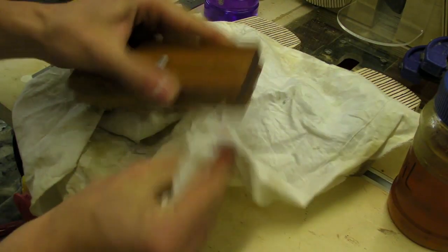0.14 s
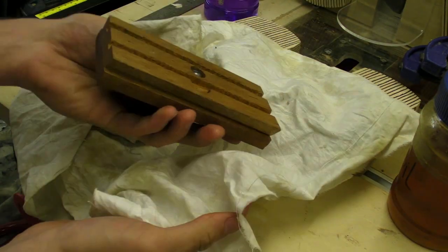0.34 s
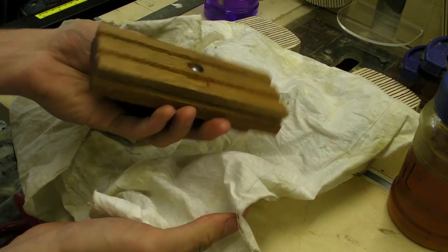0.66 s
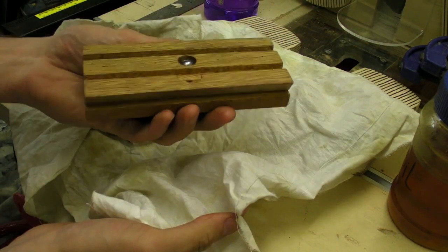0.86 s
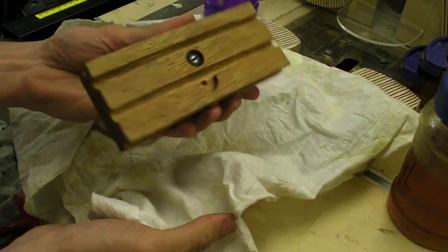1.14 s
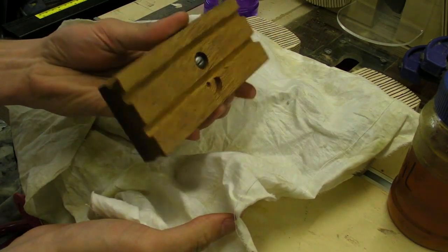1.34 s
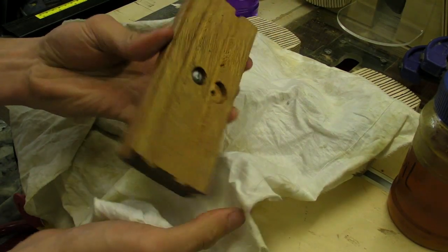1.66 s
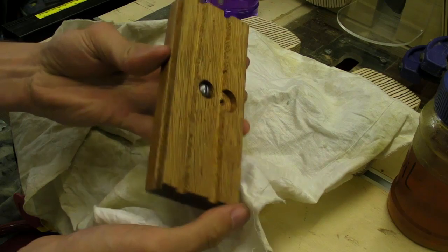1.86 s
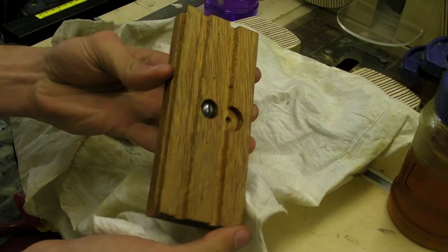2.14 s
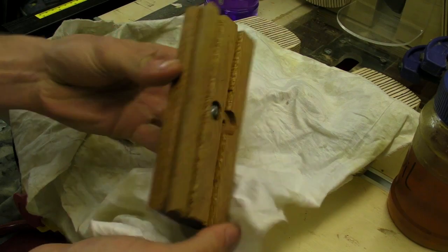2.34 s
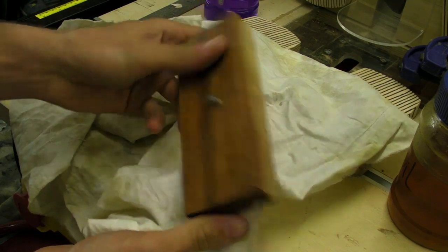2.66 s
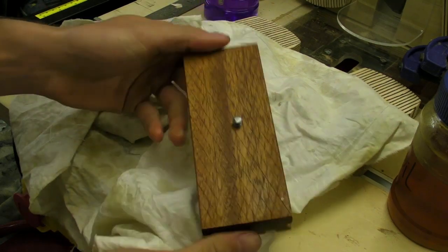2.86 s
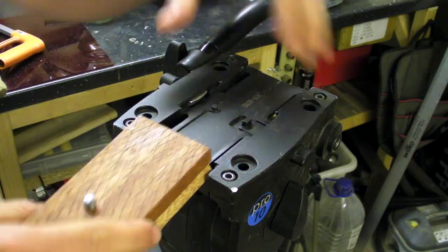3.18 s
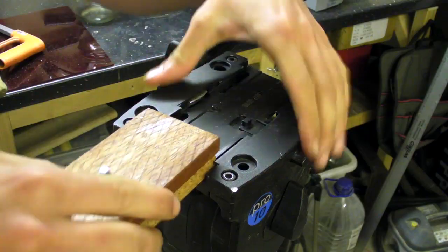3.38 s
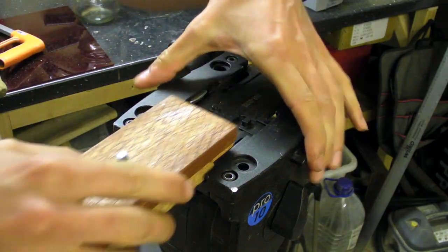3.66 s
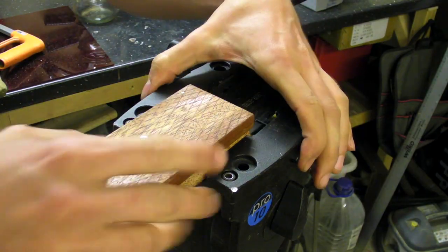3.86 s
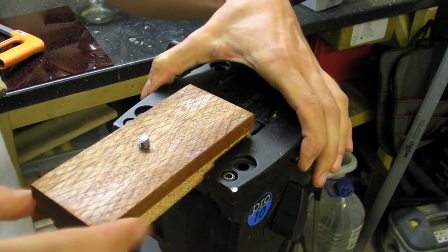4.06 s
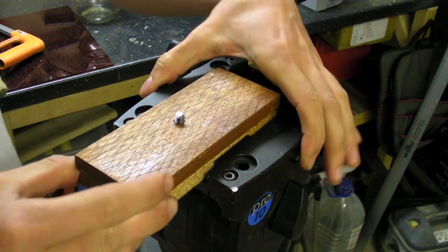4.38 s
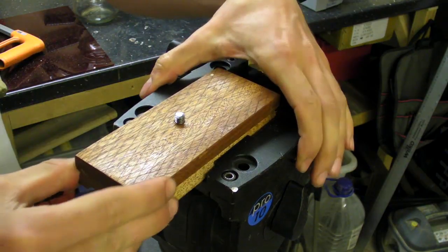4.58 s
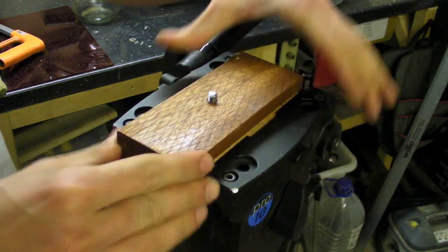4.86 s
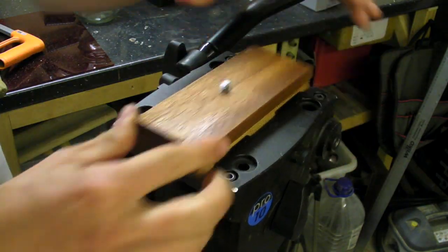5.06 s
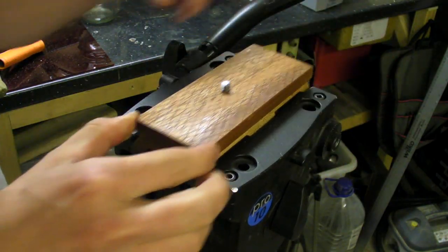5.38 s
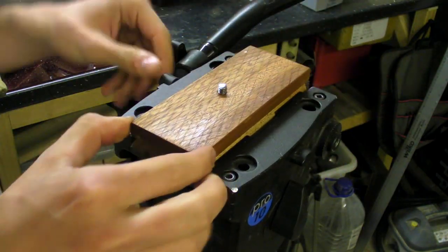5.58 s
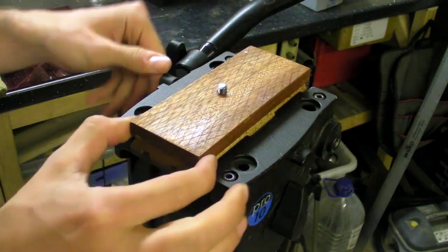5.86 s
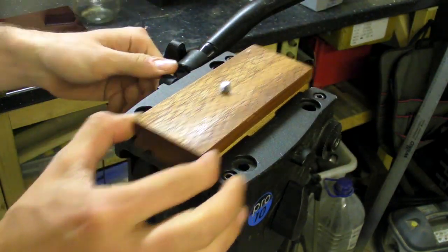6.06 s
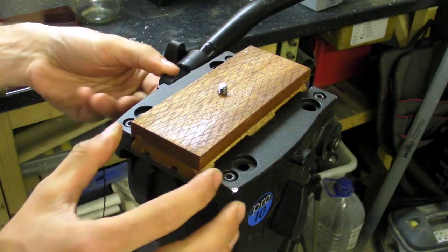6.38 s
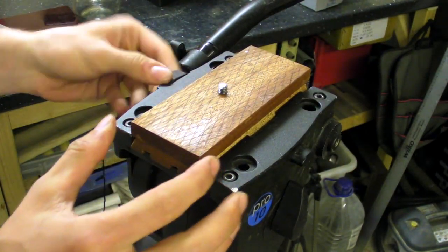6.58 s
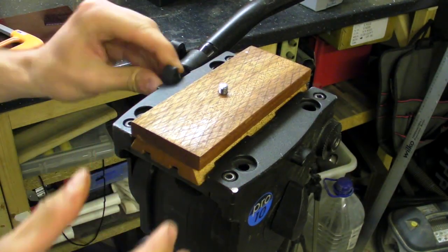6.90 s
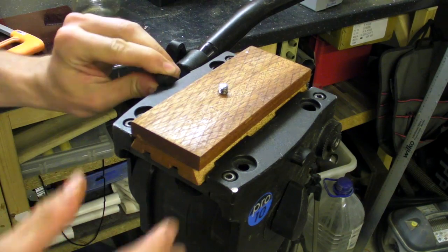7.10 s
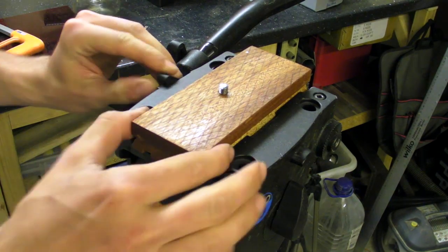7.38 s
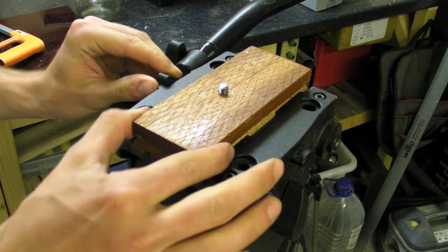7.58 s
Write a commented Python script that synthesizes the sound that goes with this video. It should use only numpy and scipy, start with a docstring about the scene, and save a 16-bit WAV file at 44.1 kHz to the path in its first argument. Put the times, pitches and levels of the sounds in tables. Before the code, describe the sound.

A cloth wipes a small wooden plate, faint handling follows, then wood knocks and slides on a metal tripod head and a catch snaps loudly.

```python
"""In a quiet workshop, over mains hum and microphone hiss, a cloth wipes a small wooden plate: shaped noise.
Hands then turn the plate over with soft rubs and dry fingertip ticks; short faint narrow hisses are heard.
It slides into the groove of a metal tripod head: noise strokes, ringing knocks, one thin squeak.
The legs sway with a low ring at the shoves; just after five seconds a catch snaps, and a lever is worked.
Rubs and snap reach the microphone dry; knocks and ticks also bring back reflections from the room."""
import sys
import numpy as np
from scipy import signal
from scipy.fft import rfft, irfft
from scipy.io import wavfile
from scipy.ndimage import uniform_filter1d

SR = 44100
rng = np.random.default_rng(int(sys.argv[2]) if len(sys.argv) > 2 else 0)


def to_wav(s):
    """Save 16-bit WAV."""
    ch = np.atleast_2d(s).T  # columns
    pcm = np.round(np.clip(ch, -1, 1) * 32767)  # PCM
    wavfile.write(sys.argv[1], SR, pcm.astype(np.int16))


N = 341334  # length [samples]


def gain_of(db):
    """Decibels to amplitude."""
    return 10 ** (np.asarray(db) / 20)


def evened(x):
    """Scales a signal to rms 1."""
    return x / np.sqrt(np.mean(x ** 2) + 1e-20)


def unsteady(shape, span):
    """Slow random wandering of rms 1: noise averaged over a span of samples."""
    return evened(uniform_filter1d(rng.standard_normal(shape), span))


def read(points, hz):
    """Reads a spectrum on a log-frequency axis."""
    f, value = np.transpose(points)
    return np.interp(np.log(hz + 1), np.log(f + 1), value)


def coloured(x, points):
    """Shapes a signal by a spectrum in dB."""
    level_db = read(points, np.fft.rfftfreq(len(x), 1 / SR))
    return irfft(rfft(x) * gain_of(level_db), len(x))


def resonate(x, hz, width):
    """Shifts hz down to zero, smooths, and shifts back: a resonance of gain 1."""
    turn = np.exp(2j * np.pi * np.cumsum(hz * np.ones(len(x))) / SR)
    pole = np.exp(-np.pi * width / SR)
    return 2 * (turn * signal.lfilter([1 - pole], [1, -pole], x / turn)).real


def patchy(x, depth_db):
    """Gives a signal random patches of louder and softer colour."""
    z = signal.stft(x, nperseg=256)[2]
    noise = rng.standard_normal(z.shape)
    patches = evened(uniform_filter1d(uniform_filter1d(noise, 6, 0), 10, 1))  # over frequency, then time
    return signal.istft(z * gain_of(depth_db * patches), nperseg=256)[1][:N]


EDGE_DB = 20  # how far a stroke swells over its rise and sinks over its fall


def stroke(s, rise, hold, fall, db):
    """Gain of one gesture: swells to full, holds, sinks away, evenly in decibels."""
    rise, hold, fall, out = abs(rise), abs(hold), abs(fall), np.zeros(N)
    near = np.arange(max(int((s - 4 * rise) * SR), 0), min(int((s + hold + 4 * fall) * SR), N))
    t = near / SR - s
    edges = np.maximum(np.maximum(-t / rise, (t - hold) / fall), 0)
    out[near] = gain_of(db - EDGE_DB * edges)
    return out


def strokes(rows, axis):
    """Sums all gestures of a table, at the level in one of its columns."""
    return sum(stroke(*row[:4], row[axis]) for row in rows)


# Room rumble and microphone hiss together: (frequency [Hz], relative level [dB])
AIR_SPECTRUM = [(15, -61.5), (25, -31), (53, 2.5), (130, -4.5), (200, -6), (263, -12), (293, -17.5),
                (394, -7.5), (560, -18.5), (1700, -26), (2220, -23.5), (16000, -33)]
AIR_DB = -67.5  # rms level
# Mains hum partials: (frequency [Hz], level [dB])
HUM_PARTIALS = [(200.3, -74), (300.6, -83), (400.7, -81)]
# One spell of dull rustle: (time at full [s], rise [s], hold [s], fall [s], level [dB])
DULL_RUSTLE = (6.5, 2, 0.07, 1.1, -68.5)


def air():
    """Room rumble, microphone hiss, a spell of dull rustle and wavering mains hum."""
    t = np.arange(N) / SR
    hiss = gain_of(AIR_DB) * evened(patchy(coloured(rng.standard_normal(N), AIR_SPECTRUM), 2.1))
    rustle = evened(resonate(resonate(rng.standard_normal(N), 490.0, 341), 460, 340))
    out = hiss + rustle * stroke(*DULL_RUSTLE)
    waver = unsteady((len(HUM_PARTIALS), N), 4000)
    for (hz, db), w in zip(HUM_PARTIALS, waver):
        out += np.sqrt(2) * gain_of(db + 1.4 * w) * np.sin(2 * np.pi * hz * t)
    return out


# Strokes of the cloth:
# (time at full [s], rise [s], hold [s], fall [s], rub body level [dB], swish level [dB])
CLOTH_WIPES = [(0, .01, .13, 0.028, -53.5, -44), (.215, 0.047, 0.1985, 0.0033, -64.5, -58.5)]
# Colour of the cloth's swish: (frequency [Hz], relative level [dB])
SWISH_SPECTRUM = [(1300, -11), (2200, -7), (2800, -4.5), (4500, -8.5), (6700, -4), (11000, -8),
                  (16000, -12)]
# Hollow under the wiping hand: (time [s], frequency [Hz], lift [gain])
HAND_HOLLOW = [(0, 3430, 4.8), (.2, 3350, 0.55), (.3, 3300, 1), (.33, 3450, 2.3), (.41, 3750, 2.4)]
# Noise strokes, dull and bright: rubs, and short swells peaking around the hits:
# (time at full [s], rise [s], hold [s], fall [s],
# body level [dB], fine hiss level [dB], low grind level [dB])
NOISE_STROKES = [(0.705, .05, .01, 0.069, -81.5, -70.5, -87), (0.831, 0.054, .006, 0.029, -79, -69.5, -85),
                 (1.1, 0.11, 0.0091, 0.071, -87, -73.5, -88), (1.608, 0.073, 0.026, 0.085, -77, -76.5, -76),
                 (2.339, 0.089, 0.26, 0.11, -63, -71, -74), (2.68, 0.11, 0.058, 0.077, -65, -60.5, -68.5),
                 (3.237, 0.079, 0.016, 0.15, -52.5, -61, -47),
                 (3.445, 0.014, 0.002, 0.018, -32.5, -43.5, -39),
                 (3.531, 0.079, 0.056, 0.05, -58, -68, -54), (3.708, 0.11, 0.069, 0.13, -52.5, -60, -51),
                 (4.171, 0.068, 0.084, 0.086, -47.5, -49, -45.5),
                 (4.434, 0.064, 0.088, 0.11, -66.5, -78.5, -63.5),
                 (4.604, 0.016, 0.12, 0.046, -43.5, -51.5, -57),
                 (4.849, 0.033, 0.061, 0.23, -62, -74, -57.5),
                 (5.089, 0.055, 0.003, 0.0048, -29.5, -30, -51),
                 (5.246, 0.026, 0.003, 0.045, -31, -40.5, -38),
                 (5.369, 0.039, 0.045, 0.025, -58.5, -56, -60),
                 (5.504, 0.033, 0.016, 0.067, -53.5, -55.5, -63),
                 (5.69, 0.018, 0.0034, 0.03, -57.5, -57, -48),
                 (5.779, 0.02, 0.016, 0.065, -55, -52.5, -47.5),
                 (5.967, 0.045, 0.0028, 0.021, -35.5, -47, -49),
                 (6.111, 0.044, 0.0035, 0.059, -32, -42.5, -38.5),
                 (6.247, 0.018, 0.0039, 0.024, -61.5, -61, -53.5),
                 (6.587, 0.11, 0.0098, 0.094, -68.5, -72.5, -74.5),
                 (7.32, 0.042, 0.027, 0.12, -74, -68.5, -90), (7.6, .03, 0.016, 0.14, -70, -74.5, -74)]
# Colours of body, fine hiss and low grind: (frequency [Hz], relative level [dB])
BODY_SPECTRUM = [(150, -35), (400, -1), (700, -5), (1400, -4), (2400, -1), (4000, -6.5), (8000, -29)]
HISS_SPECTRUM = [(1500, -19.5), (2800, -0.5), (4500, -2.5), (6800, 1.5), (8500, 1), (11000, -5.5),
                 (16000, -16)]
GRIND_SPECTRUM = [(200, -31), (380, 2), (650, -2), (1200, -13.5), (2500, -36)]
# Modes of the wooden plate, also struck by the knocks:
# (frequency [Hz], relative level [dB], time to fall 60 dB [s])
PLATE_MODES = [(377, -17, 0.02), (432, 4.5, 0.0098), (614.6, -3, .016), (802, 2, 0.0074), (960, 2.5, 0.01),
               (1300, 5.5, 0.009), (1640, -1, 0.0091), (1950, -4, 0.0084)]


def rubs():
    """Wipes, rubs and short swells around the hits: dense fine noise grains in dull and bright colours."""
    grain = np.minimum(rng.exponential(1, (2, N)), 6)
    slips = rng.standard_normal((2, N)) * gain_of(2.6 * grain)
    flutter = gain_of(1.6 * unsteady((2, N), 250))

    body = coloured(slips[0], BODY_SPECTRUM)
    plate = sum(gain_of(db) * resonate(body, hz, 210) for hz, db, _ in PLATE_MODES)
    body = body + 0.22 * plate
    grind = coloured(body[::-1], GRIND_SPECTRUM)  # reversed, so its grains differ from the body's

    hiss = coloured(slips[1], HISS_SPECTRUM)
    hiss = hiss + 1.1 * resonate(hiss, 3680, 330)  # the groove of the head sings along

    swish = coloured(slips[1], SWISH_SPECTRUM)
    s, hz, lift = np.transpose(HAND_HOLLOW)
    hz, lift = (np.interp(np.arange(N) / SR, s, v) for v in (hz, lift))
    # a moving and a still hollow under the hand
    swish = swish + lift * resonate(swish, hz, 440) + 2.7 * resonate(swish, 2160, 150)

    bright = evened(hiss) * strokes(NOISE_STROKES, axis=5) + evened(swish) * strokes(CLOTH_WIPES, axis=5)
    dull = evened(body) * strokes(CLOTH_WIPES + NOISE_STROKES, axis=4)
    dull = dull + evened(grind) * strokes(NOISE_STROKES, axis=6)
    return patchy(flutter[0] * dull + flutter[1] * bright, 2.8)


# Low and upper mode of the tripod legs: (low [Hz], upper [Hz]), then their falls: (low [s], upper [s])
LEG_MODES_HZ = (70, 123)
LEG_FALLS_S = (0.13, 0.097)
SHOVE_RISE_S = 0.067
THUD_DB, THUD_S = 8.5, .0016  # dull push with each shove: level re upper ring, width
# Shoves that set the legs swaying: (time at full [s], low ring level [dB], upper ring level [dB])
LEG_SHOVES = [(0.089, -73, -65), (0.269, -58.5, -61.5), (3.297, -54, -48.5), (3.47, -52.5, -49.5),
              (3.58, -59, -52.5), (3.64, -46.5, -68), (4.219, -50, -55.5), (4.29, -57.5, -45),
              (4.55, -56, -72), (4.621, -54.5, -46.5), (4.749, -47, -49), (4.872, -55, -48),
              (4.94, -41, -62.5), (5.08, -50, -44), (5.247, -50.5, -47), (5.38, -53.5, -58.5),
              (5.801, -60, -49.5), (5.971, -60.5, -47.5), (6.12, -57.5, -49), (7.37, -51.5, -70),
              (7.71, -53, -64.5)]


def sway():
    """Two low leg modes, narrow and slightly unsteady, rung by each shove."""
    t = np.arange(N) / SR
    drift = unsteady((2, N), 3000)  # phase [rad]
    tones = [np.sqrt(2) * np.cos(2 * np.pi * hz * t + d) for hz, d in zip(LEG_MODES_HZ, drift)]
    out = np.zeros(N)
    for s, low_db, upper_db in LEG_SHOVES:
        for tone, fall, db in zip(tones, LEG_FALLS_S, (low_db, upper_db)):
            out += tone * stroke(s, SHOVE_RISE_S, 0, fall, db)
        start = round(s * SR) - 600
        u = (t[start:][:1200] - s) / THUD_S
        thud = (1 - u ** 2) * np.exp(-u ** 2 / 2)
        out[start:][:1200] += gain_of(upper_db + THUD_DB) * thud
    return out


# Decay of the workshop's reflections: (frequency [Hz], time to fall 60 dB [s])
ROOM_DECAY = [(300, .3), (1000, 0.12), (3600, 0.18), (8000, 0.3), (15000, 0.2)]


def room(x):
    """Sparse reflections of random sign, each band dying at its own speed."""
    taps = np.zeros(SR // 2)
    at = np.arange(300, SR // 2 - 20, 20)
    taps[at + rng.integers(0, 20, len(at))] = rng.choice([-1., 1.], len(at))
    hz, t, z = signal.stft(taps, SR, nperseg=256)
    decay = gain_of(-60 * t / read(ROOM_DECAY, hz)[:, None])
    tail = signal.istft(z * decay, SR, nperseg=256)[1]
    return signal.fftconvolve(x, tail / np.linalg.norm(tail))[:N]


def ring(modes, draw, contact, lean_db, detune):
    """Modes driven by an uneven contact; the blow's place sets their strengths, the grip detunes them."""
    t = np.arange(len(contact)) / SR
    hz, db, t60 = np.transpose(modes)[:, :, None]
    sign = (-1.) ** np.arange(len(modes))[:, None]  # neighbouring modes swing against each other
    strength = sign * gain_of(db + lean_db + 2.0 * draw[:, :1] - 60 * t / t60)
    sound = (strength * np.sin(2 * np.pi * hz * (1 + detune * draw[:, 1:]) * t)).sum(0)
    sound = signal.fftconvolve(sound, contact)[:len(t)]
    return sound / abs(sound).max()


# Wood meeting metal: (time [s], wood level [dB], favoured plate pitch [Hz],
# metal ring level re wood [dB], crack level re wood [dB])
PLATE_KNOCKS = [(0.13, -34, 426, -23, -19), (0.342, -43, 750, -16, -22), (2.706, -46, 830, -26, -16),
                (3.173, -28, 584, -42.5, -23), (3.225, -32, 592, -28, -23), (3.247, -22.5, 550, -38, -25),
                (3.258, -16, 1270, -19, -30), (3.284, -27, 444, -31, -34), (3.412, -28.5, 376, -17, -39),
                (3.443, -13, 420, -16.5, -23), (3.558, -28, 407, -26, -24), (3.566, -22, 865, -33, -34),
                (3.835, -45.5, 1930, -7, -45), (4.099, -35, 594, -29, -23), (4.162, -21.5, 517, -21, -41),
                (4.2552, -6.5, 898, -19, -24.5), (4.281, -21.5, 377, -38, -44), (4.37, -46, 360, -4.5, -45),
                (4.516, -39, 525, -13.5, -52), (4.606, -16, 610, -31, -38), (4.6241, -5, 700.5, -20.5, -22),
                (4.731, -15, 800, -19, -40), (4.752, -18.5, 1300, -19, -26),
                (4.763, -17.5, 603, -44.5, -40), (4.875, -47, 1980, -4.5, -2), (4.934, -50, 2040, 4, 3.5),
                (5.03, -36.5, 1300, 0, -25), (5.112, -22, 596, -15.5, -30), (5.126, -21.5, 1300, -7.5, -30),
                (5.247, -10.5, 960, -1.5, -8.5), (5.332, -25.5, 418, -39, -20),
                (5.353, -28.5, 595, -21, -28), (5.425, -45, 1600, 2, -22), (5.542, -32.5, 352, -1.5, -23.5),
                (5.606, -38, 427, -16, -28.5), (5.695, -22, 377, -31, -42), (5.778, -26.5, 693, -6, -21),
                (5.895, -33.5, 384, -19, -29), (5.912, -16, 1230, -16, -29), (5.961, -28.5, 1410, 3.5, -17),
                (5.965, -15, 390, -2.5, -39), (6.031, -39, 1300, -8.5, -33), (6.102, -29.5, 2200, 15, 12.5),
                (6.108, -9, 1700, 2.5, -12), (6.807, -44.5, 378, -23, -30.5),
                (7.022, -48, 1302, -26, -25.5), (7.62, -51.5, 603, -3, -18)]
# Modes of the metal head: (frequency [Hz], relative level [dB], time to fall 60 dB [s])
HEAD_MODES = [(2640, -9, 0.02), (2950, -11.5, 0.012), (3350, -5.5, 0.0093), (3584, -3, 0.012),
              (3720, 0.3, 0.016), (3870, -4.5, 0.0085), (4543, -12.5, 0.008), (1602, -5, 0.011)]
# Colour of the crack of hard edges: (frequency [Hz], relative level [dB])
CRACK_SPECTRUM = [(2000, -16.5), (5000, 2), (7000, 6), (9000, -4), (11000, -16.5), (16000, -24.5)]
# A small plate radiates little bass: (frequency [Hz], gain [dB])
SMALL_PLATE = [(60, -40), (170, -12), (300, -12), (360, 0), (20000, 0)]
YIELD_S = .00005  # the wood yields a little
BOUNCE_S, BOUNCE = .0025, 1.6  # random spread of the second touch's delay, and its force


def knocks():
    """Wood on metal: the plate rings near where it is hit, the head rings, hard edges crack."""
    out, t = np.zeros((2, N + SR)), np.arange(4096) / SR
    count, at = len(PLATE_KNOCKS), np.arange(len(t))
    draws, grit = rng.standard_normal((count, 2, 8, 2)), rng.standard_normal((count, 3, len(t)))
    bounces = rng.random(count)
    press = (t / 0.0016 * np.exp(1 - t / 0.00098)) ** 2  # the faces meet over a millisecond or two
    chatter = 0.017 * gain_of(-60 * t / 0.046) * (1 - np.exp(-t / 0.0047))  # then rattle loosely
    crack_shape = press + 0.11 * gain_of(-60 * t / 0.16)
    give = t[:200] * np.exp(-t[:200] / YIELD_S)
    for (s, db, hz, metal_db, crack_db), draw, noise, late in zip(PLATE_KNOCKS, draws, grit, bounces):
        impact = 3.0 * (at == 50) - BOUNCE * (at == round(60 + late * BOUNCE_S * SR))
        lean_db = -6.0 * abs(np.log2(np.array(PLATE_MODES)[:, :1] / hz))  # per octave from the favoured pitch
        wood_contact = np.convolve(impact + noise[0] * (0.15 * press + chatter), give)[:len(t)]
        wood = ring(PLATE_MODES, draw[0], wood_contact, lean_db, 0.035)
        metal_contact = impact + noise[1] * (0.1 * press + 2.2 * chatter)
        metal = ring(HEAD_MODES, draw[1], metal_contact, 0, .012)
        crack = evened(coloured(noise[2], CRACK_SPECTRUM)) * crack_shape
        edge = np.convolve(impact, np.gradient(np.convolve(give, give)))[:len(t)]
        click = 0.35 * edge / abs(edge).max()  # the sudden stop itself clicks
        blow = [wood + click + gain_of(metal_db) * metal, gain_of(crack_db) * crack]
        out[:, round(s * SR):][:, :len(t)] += gain_of(db) * np.array(blow)
    rings, cracks = coloured(out[0, :N], SMALL_PLATE), out[1, :N]
    return rings + gain_of(-9.0) * room(rings) + cracks


# Short faint narrow hisses:
# (time at full [s], hold [s], frequency [Hz], width [Hz], level [dB])
NARROW_CHIRPS = [(1.38, 0.011, 2200, 110, -73), (2.715, 0.067, 3590, 260, -65.5),
                 (2.802, 0.26, 3560, 330, -74.5), (7.275, 0.087, 2640, 420, -67.5),
                 (7.294, 0.048, 3170, 424, -65.5), (7.542, .014, 8960, 110, -68)]
CHIRP_EDGE_S = 0.024  # rise and fall


def chirps():
    """Short puffs of broken, fluttering noise in a narrow resonance."""
    out, noise = np.zeros(N), rng.standard_normal(N)
    noise = noise * gain_of(4.5 * unsteady(N, 700))
    for s, hold, hz, width, db in NARROW_CHIRPS:
        near = slice(round(s * SR) - 5000, round(s * SR) + 10000)
        puff = evened(resonate(resonate(noise[near], hz, width), hz, width))
        out[near] += puff * stroke(s, CHIRP_EDGE_S, hold, CHIRP_EDGE_S, db)[near]
    return out


# Dry fingertip ticks on small hard parts: (time [s], level [dB], low mode [Hz], high mode [Hz])
FINGER_TICKS = [(2.49, -42, 4470, 5650), (4.089, -40.5, 4800, 6700), (7.024, -41.5, 2200, 4350),
                (7.3, -43, 2890, 4490)]
TICK_T60_S = 0.011  # time to fall 60 dB


def ticks():
    """Two heavily damped modes per tick, with their reflections in the room."""
    out, t = np.zeros(N), np.arange(1024) / SR
    for s, db, low_hz, high_hz in FINGER_TICKS:
        pair = np.sin(2 * np.pi * low_hz * t) + np.sin(2 * np.pi * high_hz * t)
        out[round(s * SR):][:len(t)] += gain_of(db - 60 * t / TICK_T60_S) * pair / 2
    return out + gain_of(-8.0) * room(out)


# Path of the thin squeak: (time [s], frequency [Hz], level [dB])
SQUEAK_PATH = [(3.8, 4660, -88), (3.85, 4570, -67), (3.9, 4900, -78), (3.94, 4800, -72), (3.985, 4900, -69),
               (4.031, 4880, -89)]


def squeak():
    """A slightly unsteady sine that glides."""
    s, hz, db = np.transpose(SQUEAK_PATH)
    t = np.arange(N) / SR
    wobble = unsteady((2, N), 300)
    level = gain_of(np.interp(t, s, db, -200, -200) + 3 * wobble[0])
    pitch = np.interp(t, s, hz) + 25 * wobble[1]
    return np.sqrt(2) * level * np.sin(2 * np.pi * np.cumsum(pitch) / SR)


SNAP_S, SNAP_DB = 5.0845, 1  # the spring catch drops home: time, level before its decay
# Colour of the snap: (frequency [Hz], relative level [dB])
SNAP_SPECTRUM = [(250, -16.5), (450, -5), (1000, -10), (2500, -5), (5000, -3.5), (8000, 0), (12500, -8),
                 (15300, -1.5), (17000, -10.5)]


def snap():
    """A hard broadband crack; loose steel parts crackle after it, the treble dying first."""
    t = np.maximum(np.arange(N) / SR - SNAP_S, 0)
    crash = evened(coloured(rng.standard_normal(N), SNAP_SPECTRUM))
    dull = coloured(crash, [(3500, 0.5), (7000, -17.0)])
    crackle = gain_of(1.6 * unsteady(N, 120))
    rattle = 0.069 * crash * gain_of(-60 * t / 0.2) + 0.067 * dull * np.exp(-(t / 0.072) ** 2)
    onset = 1 - np.exp(-t / .0001)
    return gain_of(SNAP_DB) * onset * (crash * gain_of(-60 * t / 0.00691) + crackle * rattle)


# Colour of the hiss that differs between the channels: (frequency [Hz], relative level [dB])
PARTING_SPECTRUM = [(15, -41.5), (25, -11), (344, -6), (405, 0.5), (641, -7), (11000, -11.5), (16000, -18)]
PARTING_DB = -75  # rms level before its swell


def scene():
    """Nearly mono: a faint hiss, swelling with loud moments, and a noisy smear part the channels."""
    loud = rubs() + sway() + knocks() + chirps() + ticks() + squeak() + snap()
    swell = (1 + abs(uniform_filter1d(loud ** 2, 1200)) / gain_of(-55.0) ** 2) ** 0.22
    side = gain_of(PARTING_DB) * swell * evened(coloured(rng.standard_normal(N), PARTING_SPECTRUM))
    # a short noisy smear of the loud sounds, opposite in the two channels
    smear = signal.oaconvolve(coloured(loud, SMALL_PLATE), rng.standard_normal(100) / 10)[:N]
    side = side + gain_of(-36.5) * smear
    mid = loud + air()
    return np.array([mid + side, mid - side])


EDGE_HZ = 16100  # upper band limit


def record(dry):
    """The microphone housing lifts a band near 3.6 kHz; peaks beyond 0.95 clip; then the band limit."""
    lifted = np.array([x + 0.32 * resonate(x, 3600, 400) for x in dry])
    clipped = np.clip(lifted, -.95, .95)
    lowpass = signal.firwin(255, EDGE_HZ, window=("kaiser", 9), fs=SR)
    return signal.oaconvolve(clipped, lowpass[None], "same")


dry = scene()
out = record(dry)
to_wav(out)
```